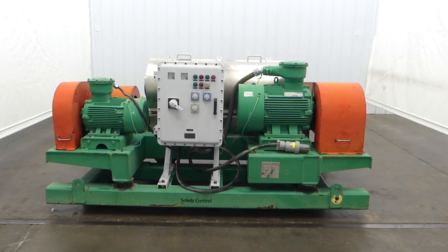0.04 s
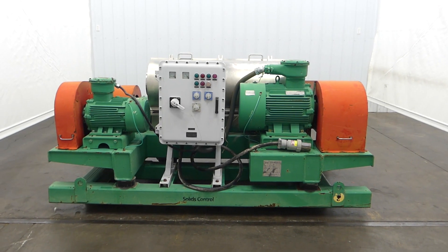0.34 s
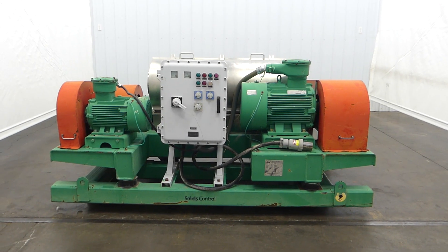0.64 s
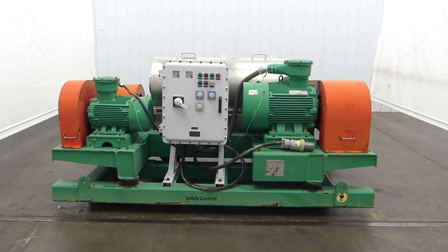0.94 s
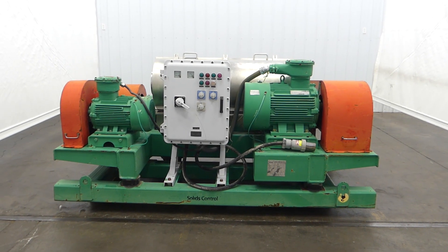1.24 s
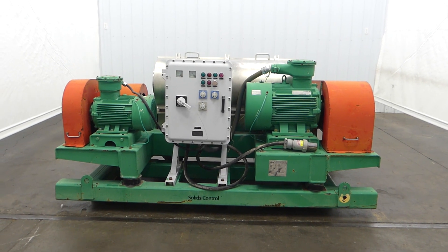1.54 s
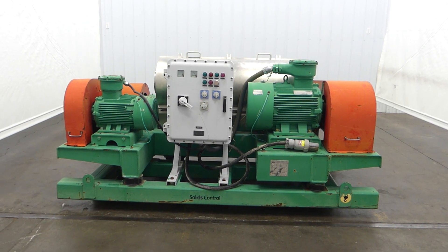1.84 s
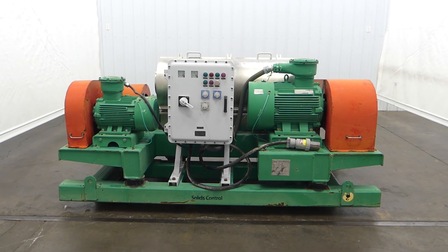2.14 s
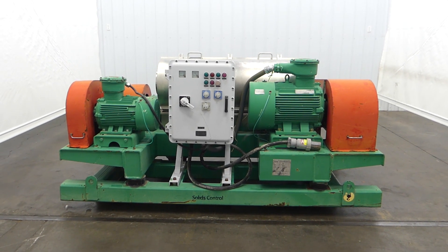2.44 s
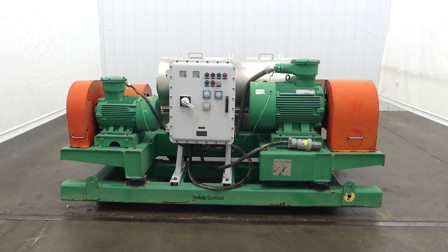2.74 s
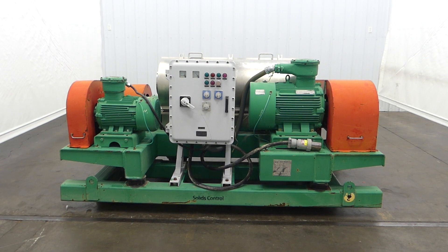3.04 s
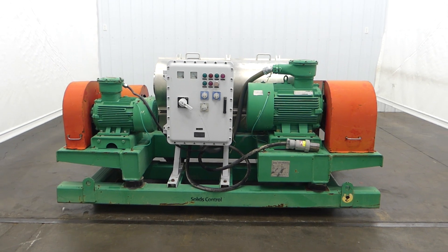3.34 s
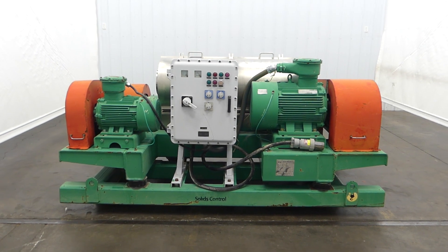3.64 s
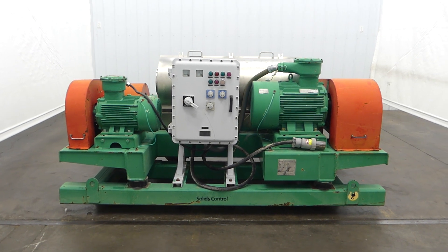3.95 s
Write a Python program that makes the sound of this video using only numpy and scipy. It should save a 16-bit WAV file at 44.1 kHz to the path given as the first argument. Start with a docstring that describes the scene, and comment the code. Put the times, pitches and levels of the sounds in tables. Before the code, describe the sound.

Four quick air tool bursts whoosh through an echoing hall over steady ventilation hum.

```python
"""A large warehouse, where an air tool is triggered four times. Each run is a quick train of strokes:
every stroke puffs exhaust air, the hardest also tick, and the hall smears them into a long whoosh.
Ventilation rumbles and hums throughout, with a few dull low swells and thin wisps of high hiss.
The sound is in stereo and starts after a moment of silence."""
import sys
import numpy as np
from scipy import signal
from scipy.fft import rfft, irfft
from scipy.io import wavfile

SR = 44100
rng = np.random.default_rng(int(sys.argv[2]) if len(sys.argv) > 2 else 0)


def master_out(mix):
    """Clip the mix to full scale and print it as 16-bit PCM to the path in sys.argv[1]."""
    frames = np.transpose(np.atleast_2d(mix))
    ceiling = np.clip(frames, -1, 1)
    pcm = np.round(ceiling * 32767).astype(np.int16)
    wavfile.write(sys.argv[1], SR, pcm)


N = 176400


def undb(db):
    """Decibels to gain."""
    return 10 ** (np.asarray(db) / 20)


def time_s():
    """Time of every sample."""
    return np.arange(N) / SR


def bins_hz():
    """Frequency of every spectral bin."""
    return np.arange(N // 2 + 1) * SR / N


def over_hz(points, hz):
    """Linear interpolation on a log-frequency axis."""
    point_hz, values = np.array(points, float).T
    return np.interp(np.log(np.maximum(hz, 1)), np.log(point_hz), values)


def colour(spectrum):
    """Gain per bin from (frequency [Hz], level [dB]) points."""
    return undb(over_hz(spectrum, bins_hz()))


def bell(hz, width_hz):
    """Gaussian spectral peak of height 1."""
    return np.exp(-2 * ((bins_hz() - hz) / width_hz) ** 2)


def noise(gain):
    """Unit-rms noise shaped by a gain per bin."""
    x = irfft(rfft(rng.standard_normal(N)) * gain, N)
    return x / x.std()


def diffuse(mid, side):
    """Two unrelated signals become stereo sound arriving from all around."""
    # left-right likeness (frequency [Hz], coherence [-1..1])
    likeness = [(25, 0), (60, 0), (120, 0.7), (290, 0.94), (640, 0.68), (1400, 0.51), (3100, 0.73),
                (6000, 0.81), (10000, 0.52), (14000, -0.1)]
    # balance (frequency [Hz], left minus right [dB])
    balance = [(60, -2), (110, -3.5), (200, -5.5), (380, -6), (700, -3), (1300, -2), (2400, -0.7),
               (4400, -0.1), (8100, -0.5), (15000, -3.5)]
    coherence = over_hz(likeness, bins_hz())
    lean_db = over_hz(balance, bins_hz()) / 2
    common = rfft(mid) * np.sqrt((1 + coherence) / 2)
    opposed = rfft(side) * np.sqrt((1 - coherence) / 2)
    return irfft(np.array([(common + opposed) * undb(lean_db), (common - opposed) * undb(-lean_db)]), N)


def wash(gain):
    """Diffuse stereo noise."""
    return diffuse(noise(gain), noise(gain))


def hall(x, build_s=0.01):
    """Dense echoes build up, then die away, sooner in the treble."""
    # reverberation (frequency [Hz], T60 [s])
    t60 = [(200, 3.7), (2000, 1.4), (4000, 1.49), (8000, 1.09), (15000, 0.47)]
    t, tail = time_s(), np.zeros((2, N))
    edges_hz = np.r_[0, np.geomspace(200, SR / 2, 21)]
    white = rfft(rng.standard_normal((2, N)))
    for lo, hi in zip(edges_hz[:-1], edges_hz[1:]):
        band = irfft(white * ((bins_hz() >= lo) & (bins_hz() < hi)), N)
        fade = undb(-60 * t / over_hz(t60, (lo + hi) / 2)) * (1 - np.exp(-t / build_s))
        tail += band * fade / np.sqrt(np.sum(fade ** 2))
    return signal.fftconvolve(diffuse(*tail), x[None], axes=1)[:, :N]


def motor_tone(hz, waver=0.55, waver_hz=4.7):
    """A motor tone wavers in level and phase on its way through the hall."""
    slow = bell(0, waver_hz)
    phase = 2 * np.pi * (hz * time_s() + rng.random())
    x = (1 + waver * noise(slow)) * np.sin(phase) + waver * noise(slow) * np.cos(phase)
    return x / x.std()


def ventilation(rumble_top_hz=1940):
    """Fans rumble and drone, motors hum, moving air rushes with a faint whine."""
    # fan rumble (frequency [Hz], level [dB])
    rumble_spectrum = [(25, -39), (55, -28), (80, -13), (115, -7), (170, -2.5), (260, -0.5), (400, -2),
                       (600, -4), (850, -4), (1200, -8.5), (2000, -9)]
    # fan drone (frequency [Hz], width [Hz], level [dB])
    drone_bands = [(200.2, 19, -50), (255.5, 23, -53), (476, 35, -51)]
    # motor tones (frequency [Hz], level [dB])
    tones = [(121, -55.5), (204.5, -49), (443.5, -50.5), (490, -52.5)]
    # rushing air (frequency [Hz], level [dB])
    air_spectrum = [(600, -20), (1500, -4), (2500, 0), (3900, -1), (4800, -5), (6000, -5.5), (7500, -11.5),
                    (9000, -8.5), (11000, -13.5), (13000, -19), (15500, -30)]
    # drift of rush and whine (time [s], level [dB])
    air_drift = [(.3, -0.5), (.8, 0), (2.0, 0), (2.8, -1), (3.5, -3), (4.0, -4)]
    rumble = undb(-35.5) * wash(colour(rumble_spectrum) / np.sqrt(1 + (bins_hz() / rumble_top_hz) ** 4))
    drone = sum(undb(db) * wash(bell(hz, width_hz)) for hz, width_hz, db in drone_bands)
    hum_pair = [sum(undb(db) * motor_tone(hz) for hz, db in tones) for _ in range(2)]
    rush = undb(-44.5) * wash(colour(air_spectrum))
    whine = undb(-57) * wash(bell(hz=4015, width_hz=170))
    drift = undb(np.interp(time_s(), *np.array(air_drift).T))
    return rumble + drone + diffuse(*hum_pair) + drift * (rush + whine)


def swells(events, spectrum):
    """Diffuse noise under Gaussian envelopes."""
    level = sum(undb(db) * np.exp(-2 * ((time_s() - at_s) / width_s) ** 2) for at_s, width_s, db in events)
    return level * wash(colour(spectrum))


def low_swells():
    """Dull low sounds rise and fade in the hall."""
    # swells (centre [s], width [s], level [dB])
    events = [(1.23, 0.065, -41), (2.31, 0.12, -35.5), (3.1, 0.085, -40), (3.38, 0.07, -42.5)]
    # dull tone colour (frequency [Hz], level [dB])
    spectrum = [(100, -33), (165, -20), (202, 19), (228, -4), (260, -4), (320, -2), (500, -17), (900, -11),
                (1400, -23), (4000, -52)]
    return swells(events, spectrum)


def wisps():
    """Thin high hiss comes and goes ahead of the first two runs."""
    # wisps (centre [s], width [s], level [dB])
    events = [(.675, .06, -55), (.77, .08, -60), (1.23, .15, -49)]
    # thin hiss (frequency [Hz], level [dB])
    spectrum = [(6000, -25), (11000, -12), (12300, 3), (13200, -10), (14500, 0), (15500, -1)]
    return swells(events, spectrum)


def ticks(decay_s=0.0024, left_minus_right_db=-6, hall_db=-4.5):
    """The tool's hardest strokes spit a sharp, briefly ringing tick."""
    # hard strokes (time [s], level [dB])
    strokes = [(0.8335, -27), (.8640, -26), (0.8913, -31), (.9495, -29), (0.983, -27), (1.4927, -27),
               (1.5226, -24), (1.5515, -27), (1.6378, -32), (2.0806, -30), (2.1348, -31), (2.1618, -35),
               (2.1885, -32), (2.8934, -33), (2.9247, -32), (2.9505, -32), (2.9783, -28)]
    # tick (frequency [Hz], level [dB])
    spectrum = [(1000, -27), (3000, -9), (5200, -3), (6200, 7.5), (7300, -6), (8200, -6), (10000, -6.5),
                (13000, -18), (15500, -16.5)]
    t = time_s()
    force = sum(undb(db) * (t >= at_s) * np.exp(-np.abs(t - at_s) / decay_s) for at_s, db in strokes)
    direct = force * wash(colour(spectrum))
    pan = undb(np.array([[0.5], [-0.5]]) * left_minus_right_db)
    return direct * pan + undb(hall_db) * hall(direct[0])


def valve(age_s, length_s, rise_s, sag_db_per_s, close_s=0.018):
    """Air flow of one run: it builds, sags with the pressure and is shut off."""
    age_s = np.maximum(age_s, 0)
    opening = 1 - np.exp(-age_s / rise_s)
    closing = np.exp(-np.maximum(age_s - length_s, 0) / close_s)
    return opening * undb(-sag_db_per_s * age_s) * closing


def exhaust(puff_decay_s=0.014, puff_depth=0.57, direct_db=-6):
    """Air leaves in puffs, one per stroke: bright hiss at once, a whistling roar as the motor starts."""
    # tool runs (start [s], length [s], stroke period [s], hiss trim [dB], roar trim [dB],
    # roar rise [s], whistle [Hz], whistle lift [dB])
    runs = [(0.832, 0.2, .0292, -0.4, 0.4, 0.054, 3560, 0.5),
            (1.4937, 0.15, 0.019, 0.5, 1.5, 0.071, 4100, 4), (2.0755, 0.21, .0278, -1, 0.5, 0.14, 4340, 6),
            (2.8912, 0.37, 0.034, 0.8, 1, 0.043, 3520, 4)]
    # exhaust hiss (frequency [Hz], level [dB])
    hiss_spectrum = [(1500, -18), (3500, 4.5), (4900, 1.5), (5700, 2.5), (7100, 2), (8000, -0.5), (9000, 1),
                     (10200, 1.5), (11500, -5.5), (13300, -9.5), (15000, -12.5)]
    # exhaust roar (frequency [Hz], level [dB])
    roar_spectrum = [(200, -15), (700, -7.5), (1400, -3), (2300, -1), (2800, 0.5), (3750, 0.5), (4600, -7),
                     (7000, -16), (15000, -45)]
    chamber_db = 6 * bell(hz=1980, width_hz=120)  # hollow resonance of the exhaust chamber
    body = colour(roar_spectrum) * undb(chamber_db)
    hiss = noise(colour(hiss_spectrum))
    air = np.zeros(N)
    for start_s, length_s, period_s, hiss_db, roar_db, roar_rise_s, whistle_hz, lift_db in runs:
        age_s = time_s() - start_s
        puffs = 1 - puff_depth + puff_depth * np.exp(-(age_s % period_s) / puff_decay_s)
        puffs /= np.sqrt(np.mean(puffs ** 2))
        roar = noise(body * undb(lift_db * bell(whistle_hz, width_hz=200)))
        hiss_flow = undb(-33.5 + hiss_db) * valve(age_s, length_s, rise_s=0.015, sag_db_per_s=19.5)
        roar_flow = undb(-29.5 + roar_db) * valve(age_s, length_s, roar_rise_s, sag_db_per_s=27.5)
        air += puffs * (hiss * hiss_flow + roar * roar_flow)
    return undb(direct_db) * air + hall(air)


def scene():
    """The air tool over the warehouse background."""
    return exhaust() + ticks() + wisps() + low_swells() + ventilation()


def record(dry, start_s=0.313, top_hz=15500):
    """Narrow treble notch, silence until start_s, steep low-pass."""
    notch = 1 - 0.95 * bell(hz=7500, width_hz=70)
    gated = irfft(rfft(dry) * notch, N) * (time_s() >= start_s)
    return signal.sosfilt(signal.ellip(8, 0.2, 80, top_hz, fs=SR, output="sos"), gated)


dry = scene()
out = record(dry)
master_out(out)
```